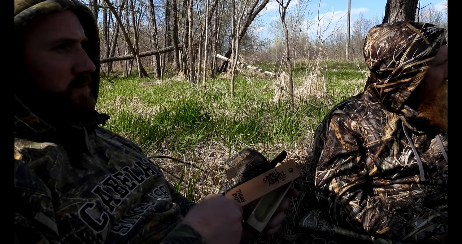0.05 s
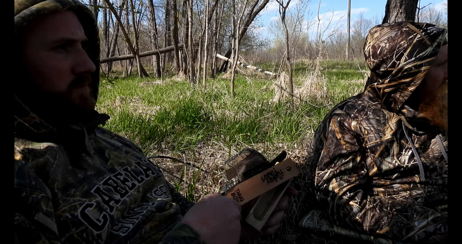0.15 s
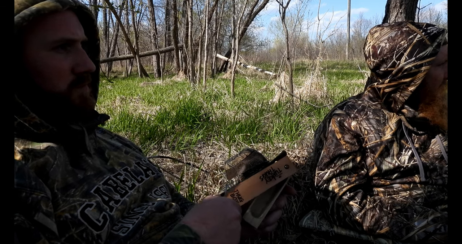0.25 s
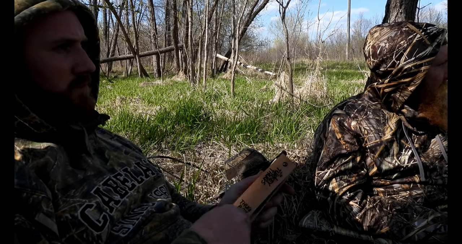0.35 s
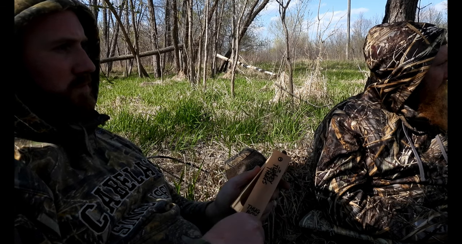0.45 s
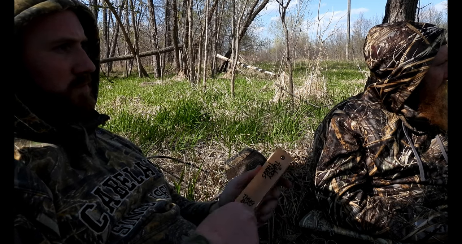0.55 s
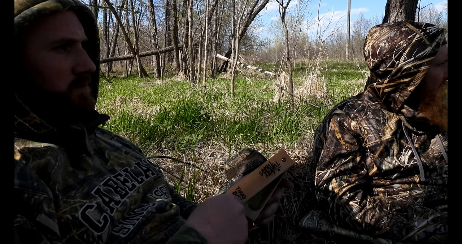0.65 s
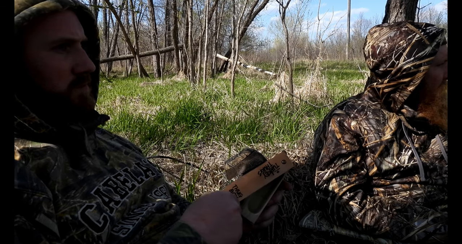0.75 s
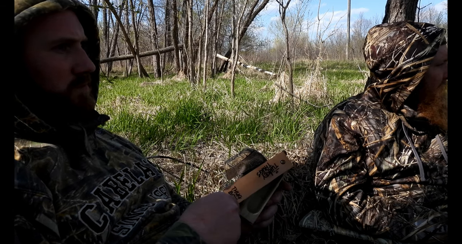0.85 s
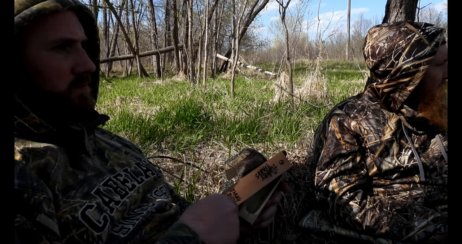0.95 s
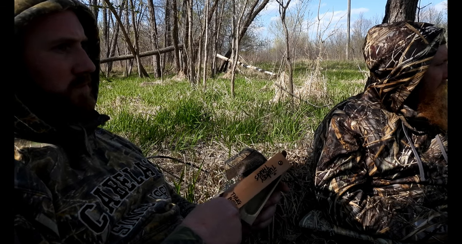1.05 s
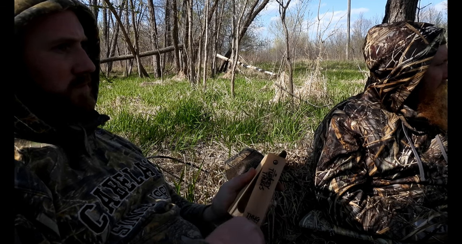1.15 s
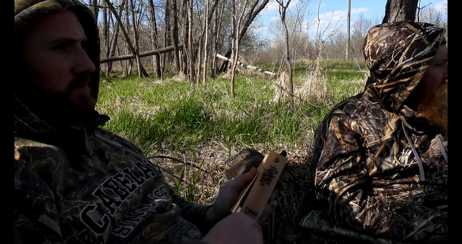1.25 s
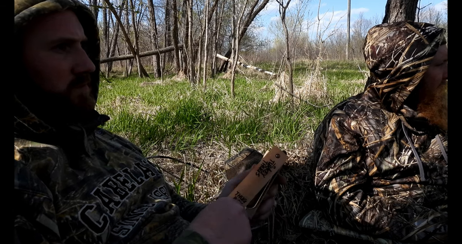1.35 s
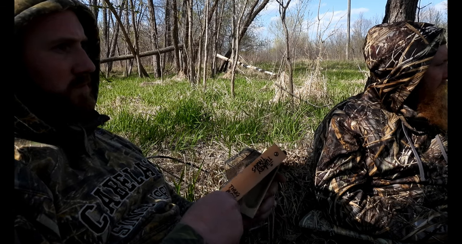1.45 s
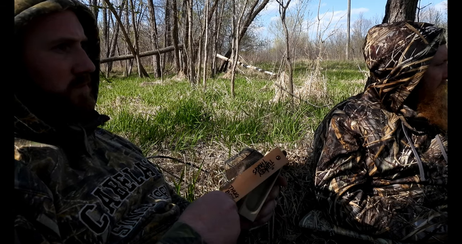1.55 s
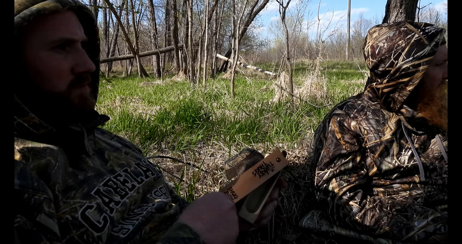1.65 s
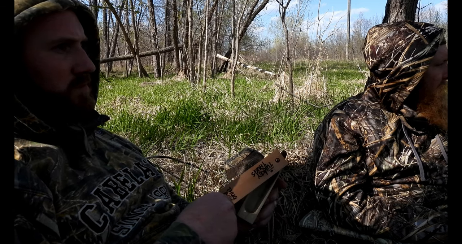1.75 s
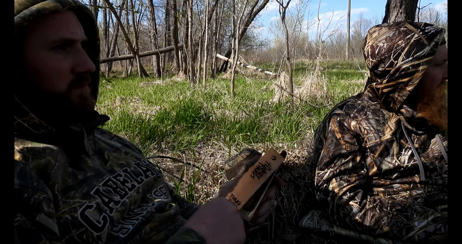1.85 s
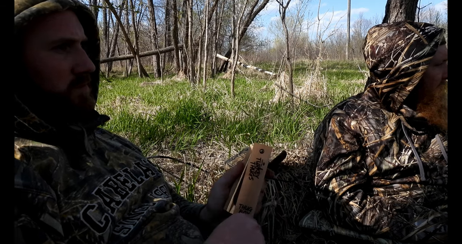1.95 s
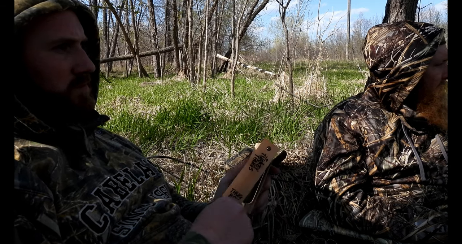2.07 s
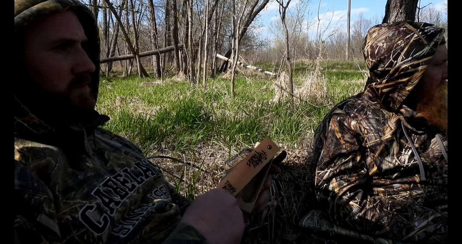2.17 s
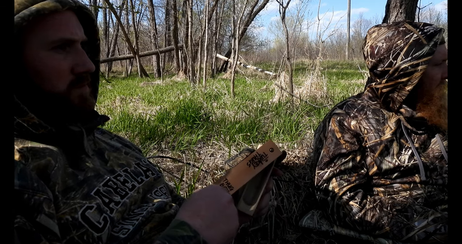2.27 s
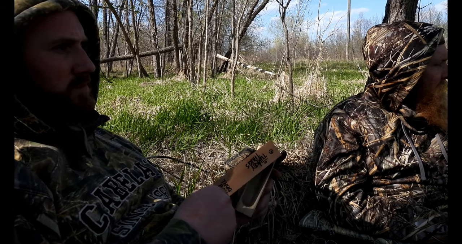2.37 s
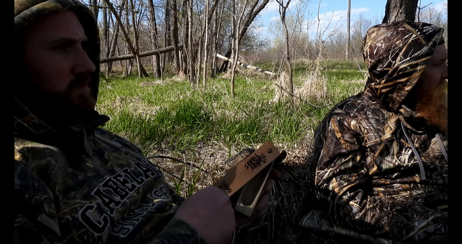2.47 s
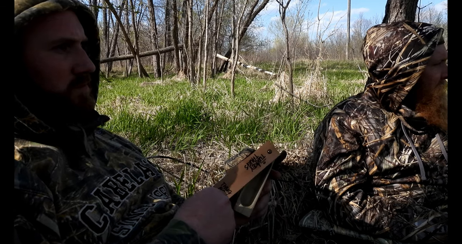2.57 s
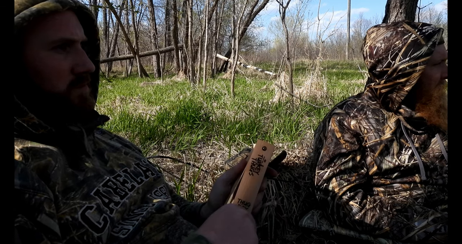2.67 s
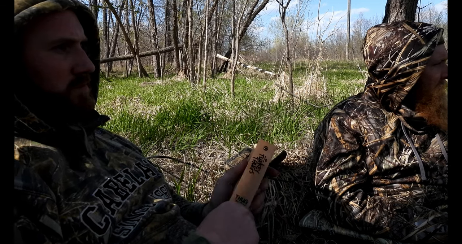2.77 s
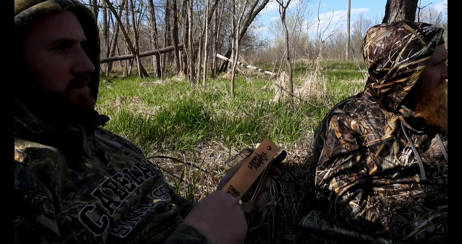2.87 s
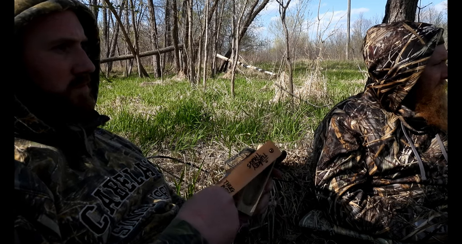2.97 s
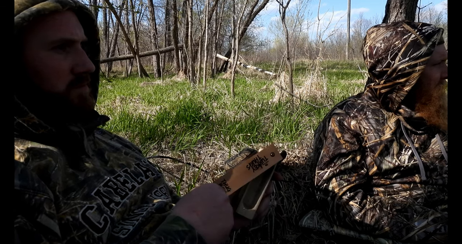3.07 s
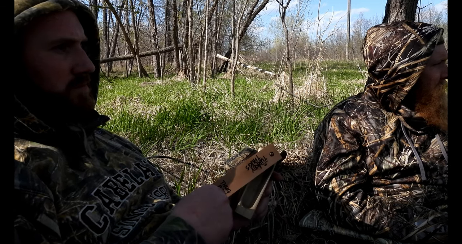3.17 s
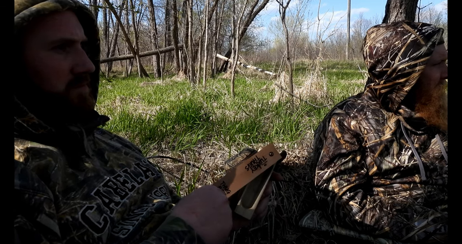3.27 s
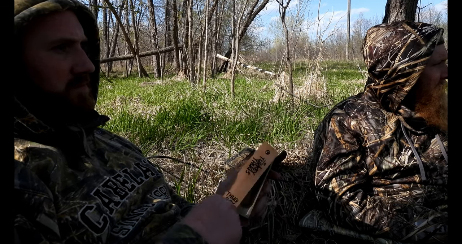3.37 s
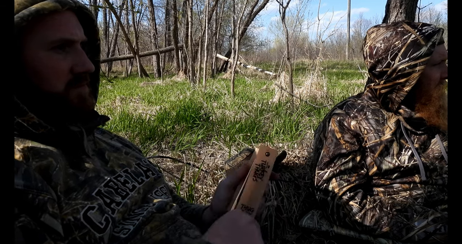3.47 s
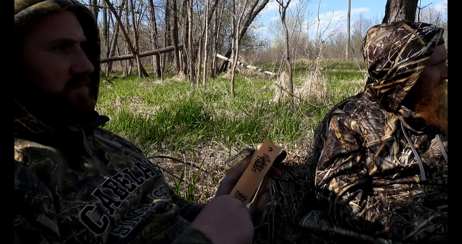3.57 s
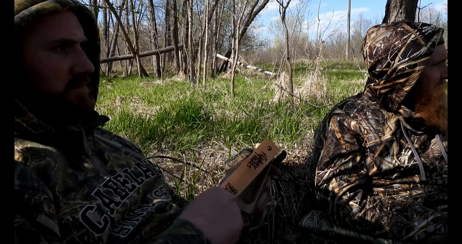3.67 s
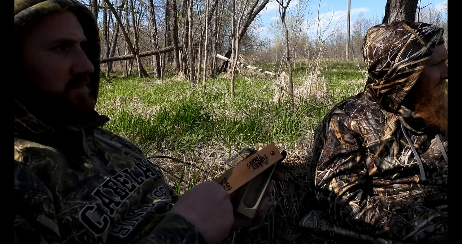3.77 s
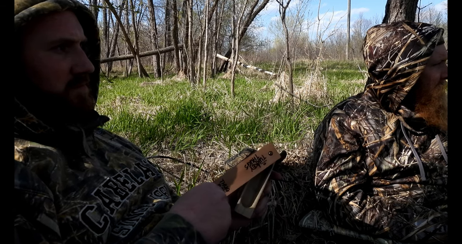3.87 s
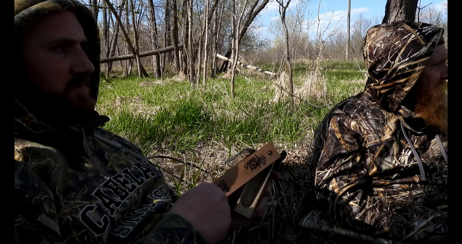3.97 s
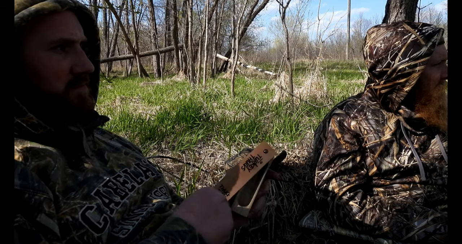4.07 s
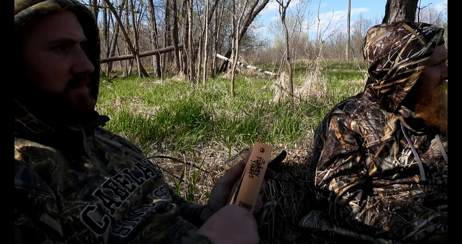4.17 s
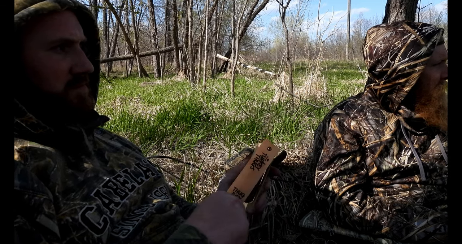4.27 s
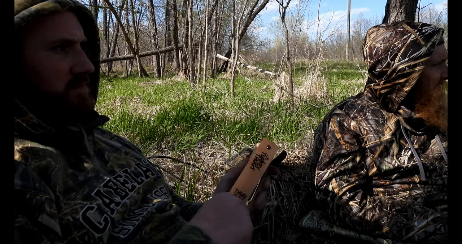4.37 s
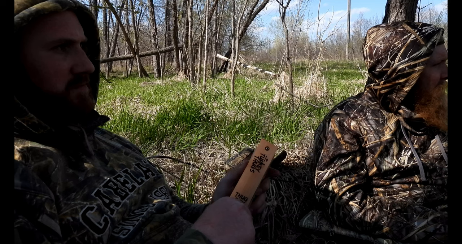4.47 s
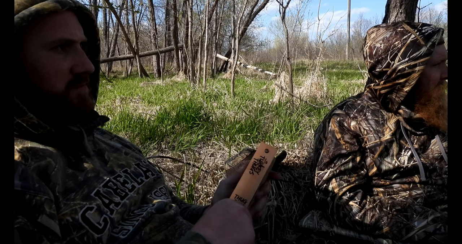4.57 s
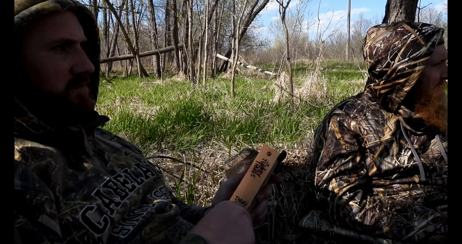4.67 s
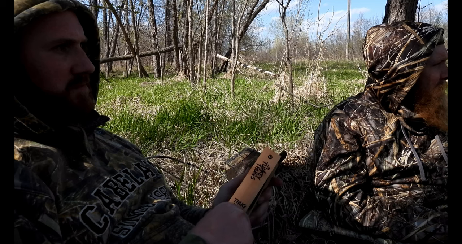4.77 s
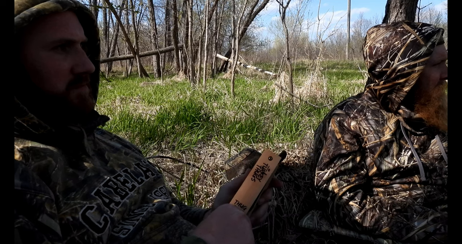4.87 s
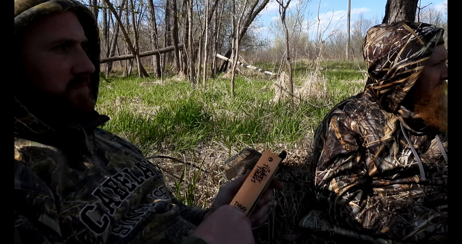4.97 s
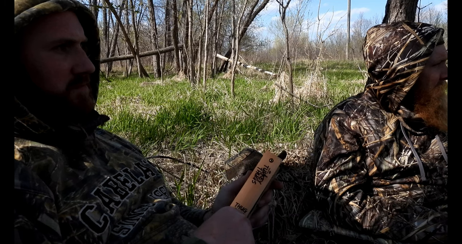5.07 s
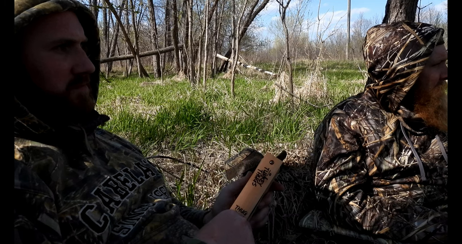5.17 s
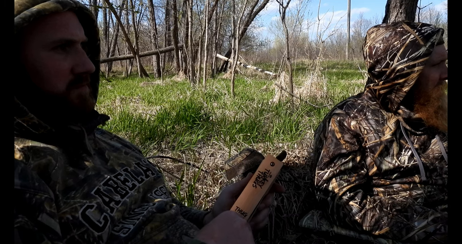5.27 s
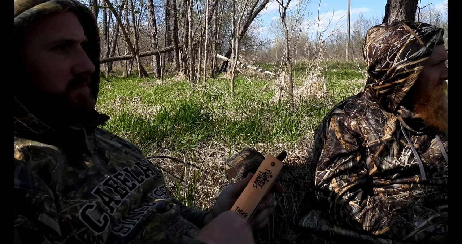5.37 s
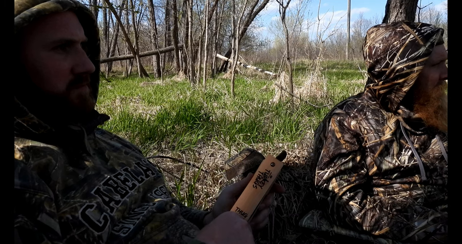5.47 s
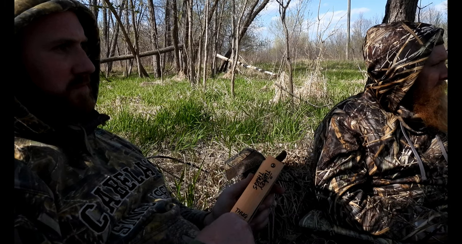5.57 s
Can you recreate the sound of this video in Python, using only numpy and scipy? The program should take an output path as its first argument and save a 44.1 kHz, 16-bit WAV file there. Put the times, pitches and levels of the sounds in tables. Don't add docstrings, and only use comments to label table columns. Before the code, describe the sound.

Quiet woods with far traffic hum and soft air hiss. A wooden box call yelps six times at a steady pace, the first longest with a dragging scrape before it, the last two shortest. Small wooden ticks come between strokes. The sound is close, dry and slightly overloaded, with a faint tree echo, ending in a closing tick and leafy rustle.

```python
import sys
import numpy as np
from scipy import signal
from scipy.fft import rfft, irfft, next_fast_len
from scipy.io import wavfile
from scipy.ndimage import uniform_filter1d

SR = 44100
rng = np.random.default_rng(int(sys.argv[2]) if len(sys.argv) > 2 else 0)


def gain_from_db(level_db):
    decades = np.asarray(level_db, float) / 20
    return 10 ** decades


def put_to_file(sound):
    columns = np.atleast_2d(sound).T
    safe = np.clip(columns, -1, 1)
    whole_steps = np.round(safe * 32767)
    wavfile.write(sys.argv[1], SR, whole_steps.astype(np.int16))


N = 248028

# (lid touches [s], grips [s], starts its sweep [s], reaches the wide end [s], lets go [s])
STROKE_TIMES = [
    (.471, .478, .495, .533, .554),
    (1.236, 1.243, 1.252, 1.280, 1.292),
    (2.017, 2.026, 2.036, 2.060, 2.066),
    (2.766, 2.778, 2.783, 2.807, 2.816),
    (3.522, 3.529, 3.535, 3.552, 3.559),
    (4.249, 4.256, 4.260, 4.275, 4.281),
]
# (time [s], length [s], first level [dB], last level [dB])
LID_SLIDE_OFFS = [
    (.571, .034, -29, -54),
    (1.309, .018, -22, -33),
    (1.327, .042, -28, -62),
]


def unit(x):
    return x / np.sqrt(np.mean(x ** 2))


def resonance(x, hz, width_hz):
    return signal.lfilter(*signal.iirpeak(hz, hz / width_hz, fs=SR), x)


def steep_resonance(x, hz, width_hz):
    return resonance(resonance(x, hz, width_hz), hz, width_hz)


def butterworth(x, order, hz, kind):
    return signal.sosfilt(signal.butter(order, hz, kind, fs=SR, output="sos"), x)


def curve(rows, column, outside):
    rows = np.array(rows)
    return np.interp(np.arange(N) / SR, rows[:, 0], rows[:, column], outside, outside)


def clicks(times_s, sizes):
    out = np.zeros(N)
    at = np.asarray(times_s)[:, None] * SR
    taps = np.floor(at).astype(int) + np.arange(-7, 9)
    window = np.cos(np.pi * (taps - at) / 16) ** 2
    np.add.at(out, taps, np.asarray(sizes)[:, None] * np.sinc(taps - at) * window)
    return out


def box(x):
    # (frequency [Hz], width [Hz], level [dB])
    modes = [(1060, 290, -1.5), (1225, 90, 4.5), (1315, 170, 5), (1600, 300, 3), (1785, 110, 1),
             (2010, 380, 1), (2330, 110, 2), (2487, 170, 0), (2956, 210, -9.5), (3136, 560, -19),
             (4100, 170, -17.5), (4730, 300, -22.5), (4900, 470, -12.5), (5313, 170, -10), (5900, 220, -13),
             (6490, 210, -24.5), (7970, 240, -28)]
    # (frequency [Hz], width [Hz], share cancelled [0-1])
    hollows = [(900, 110, .7), (2400, 200, 0.5), (3640, 570, 0.8), (4355, 350, .9), (4820, 270, 0.6)]
    rings = np.zeros(len(x))
    for k, (hz, width_hz, db) in enumerate(modes):
        rings += (-1) ** k * gain_from_db(db) * resonance(x, hz, width_hz)
    for hz, width_hz, share in hollows:
        rings = rings - share * resonance(rings, hz, width_hz)
    return butterworth(rings, 4, 880, "high")


def duck():
    drop_db, recover_db_per_s = -18, 8
    t, db = np.arange(N) / SR, np.zeros(N)
    for _, grip, *_ in STROKE_TIMES:
        since = t - grip
        db = np.where(since > 0, np.minimum(drop_db + recover_db_per_s * since, 0), db)
    return gain_from_db(uniform_filter1d(db, size=800))


def woods(gain):
    # (frequency [Hz], level per Hz [dB])
    spectrum = [(15, -43.5), (25, -12.5), (70, -5.5), (96, -3), (113, -5.5), (179, -18.5), (333, -12),
                (402, -10.5), (541, -8), (953, 1), (1510, -7.5), (2730, -27.5), (3670, -29), (6130, -31.5),
                (15800, -40)]
    level_db, flicker_db = -47.5, 0.4
    hum_hz, hum_width_hz, hum_db = 97, 9.8, -16.5
    treble_hz, treble_duck, bass_hz, bass_duck = 2940, 3.6, 60, 0.65
    spectrum_hz, spectrum_db = np.transpose(spectrum)
    size = next_fast_len(N, real=True)
    f = np.fft.rfftfreq(size, 1 / SR) + 1
    noise = rfft(rng.standard_normal(size)) * gain_from_db(np.interp(np.log(f), np.log(spectrum_hz), spectrum_db))
    noise = noise / np.sqrt(np.mean(irfft(noise, size) ** 2))
    out = gain * gain_from_db(hum_db) * unit(resonance(rng.standard_normal(N), hum_hz, hum_width_hz))
    half_octave = np.round(2 * np.log2(f))
    coarse = np.arange(0, N, 200)
    for band in range(8, 29):
        walk = np.repeat(rng.standard_normal(len(coarse) // 20 + 1), 20)[:len(coarse)]
        walk = unit(uniform_filter1d(walk, size=20))
        hz = 2 ** (band / 2)
        sink = 1 + (treble_duck - 1) / (1 + (treble_hz / hz) ** 6) + bass_duck / (1 + (hz / bass_hz) ** 4)
        band_gain = np.repeat(gain[coarse] ** sink * gain_from_db(flicker_db * walk), repeats=200)[:N]
        out = out + band_gain * irfft(noise * (half_octave == band), size)[:N]
    return out * gain_from_db(level_db)


def slides():
    # (lead [s], first level [dB], level before the bite [dB], at the bite [dB])
    approaches = [
        (.17, -58, -33, -17),
        (.046, -64, -40, -29),
        (.05, -66, -30, -22),
        (.05, -62, -33, -28),
        (.06, -64, -29, -22.5),
        (.055, -72, -23, -24),
    ]
    bite_s = .005
    ramps = []
    for (touch, *_), (lead, first_db, near_db, bite_db) in zip(STROKE_TIMES, approaches):
        ramps.append([(touch - lead, first_db), (touch - bite_s, near_db), (touch, bite_db)])
    for s, length, first_db, last_db in LID_SLIDE_OFFS:
        ramps.append([(s, first_db), (s + length, last_db)])
    return ramps


def scrapes():
    grains_per_s, hiss_db, slide_off_hiss_db = 2500, -31, 3.5
    hiss_sink = .33
    grains = (rng.random(N) < grains_per_s / SR) * rng.standard_normal(N)
    grains = grains * gain_from_db(2.5 * rng.exponential(size=N))
    body = unit(resonance(box(grains), 1650, 800))
    hiss = unit(resonance(rng.standard_normal(N) + .5 * unit(grains), 3500, 6000))
    body_gain = sum(gain_from_db(curve(rows, 1, -200)) for rows in slides())
    hiss_gain = gain_from_db(hiss_db) * body_gain ** (1 - hiss_sink) * (body_gain > 1e-6)
    for s, length, *_ in LID_SLIDE_OFFS:
        hiss_gain *= gain_from_db(curve([(s, slide_off_hiss_db), (s + length, slide_off_hiss_db)], 1, 0))
    return uniform_filter1d(body_gain, size=130) * body + uniform_filter1d(hiss_gain, size=130) * hiss


def blows():
    # (time [s], peak [dB], low ring [Hz], high ring [Hz], t60 [s])
    ticks = [
        (0.572, -24, 1171, 1609, .018),
        (1.104, -50, 893, 1600, .017),
        (1.3095, -6, 1220, 1577, .019),
        (2.613, -39, 1123, 2112, .018),
        (2.695, -30.5, 1345, 1687, .018),
        (3.353, -44.5, 957, 1536, .022),
        (4.045, -37.5, 1264, 2095, .018),
        (4.125, -36, 1320, 1610, .027),
        (5.34, -28, 1060, 1850, .035),
    ]
    # (time [s], peak [dB], high ring [Hz], t60 [s])
    catches = [
        (.458, -22, 1850, .03),
        (.4665, -19, 2200, .015),
        (3.514, -14.5, 2300, .015),
        (3.519, -21, 2000, .015),
        (4.2435, -10.5, 2400, .029),
    ]
    rows = [(s, db, low_hz, high_hz, -1.5, t60) for s, db, low_hz, high_hz, t60 in ticks]
    rows += [(s, db, 1290, high_hz, 3, t60) for s, db, high_hz, t60 in catches]
    rows += [(let_go - .0005, -8, 1200, 2610, -13, .04) for *_, let_go in STROKE_TIMES]
    return rows


def knocks():
    ring_rise_s, rattle_decay_s = 0.00053, 0.00067
    snap_db, snap_hz, rattle_db = -27, 4500, 11.5
    out, rattle, t = np.zeros(N), np.zeros(N), np.arange(SR // 8) / SR
    for s, db, low_hz, high_hz, high_db, t60 in blows():
        ring = np.sin(2 * np.pi * low_hz * t) + gain_from_db(high_db) * np.sin(2 * np.pi * high_hz * t)
        envelope = 1000. ** (-t / t60) * (1 - np.exp(-t / ring_rise_s)) ** 2
        grit = rng.standard_normal(len(t)) * np.exp(-t / rattle_decay_s)
        out[int(s * SR):][:len(t)] += gain_from_db(db - 2) * ring * envelope
        rattle[int(s * SR):][:len(t)] += gain_from_db(db) * grit
    rings = butterworth(out, 2, 700, "high")
    snap = gain_from_db(snap_db) * steep_resonance(rattle, snap_hz, 5000)
    return rings + snap + gain_from_db(rattle_db) * steep_resonance(box(rattle), 1400, 1300)


def slip_rate(touch, grip, top, wide, end):
    touch_hz, grip_hz, top_hz, wide_hz = 1270, 1330, 1362, 975
    sweep_bend, rise_hz_per_s = 1.5, 12000
    share = np.linspace(0, 1, num=10)
    fall_hz = top_hz - (top_hz - wide_hz) * share ** sweep_bend
    return [(touch, touch_hz), (grip, grip_hz), *zip(top + share * (wide - top), fall_hz),
            (end, wide_hz + rise_hz_per_s * (end - wide))]


def stroke(times, hand):
    touch, grip, top, wide, end = times
    touch_db, grip_db, wide_db, end_db, shake = hand
    shake_holds, shake_ends, ease_share = .17, .36, .7
    ease_db = -2.5
    slide_s = .006
    sweep = wide - top
    s = np.array([touch, grip, top + shake_holds * sweep, top + shake_ends * sweep,
                  top + ease_share * sweep, wide, min(wide + slide_s, end), end])
    db = np.interp(s, [touch, grip, wide, end], [touch_db, grip_db, wide_db, end_db])
    db[4] += ease_db
    rough = [.5, .17, .11, .11, .03, .07, .36, .36]
    return np.transpose([s, db, rough, shake * np.array([.4, 1, 1, 0, 0, 0, 0, 0])])


def yelps():
    # (pressure at the touch [dB], at the grip [dB], at the wide end [dB],
    # at the let-go [dB], lid shake [0-1])
    hands = [
        (-22, -12.5, -5.5, -13, .75),
        (-28, -13, -4.5, -9, .8),
        (-23, -11, -5.5, -8, .9),
        (-30, -11, -3.5, -10, .03),
        (-24, -10, -4.5, -8, .4),
        (-27, -10.5, -6, -8, 1),
    ]
    lid_turns = 5 / 3
    lid_ring_db, tone_db, scatter_db = -5, 28, 9
    rasp_db, rasp_hz, thump_db, thump_hz = -34, 8500, -43, 260
    times, sizes, pressure, ring = [], [], np.zeros(N), np.zeros(N)
    for moments, hand in zip(STROKE_TIMES, hands):
        rate_s, rate_hz = np.transpose(slip_rate(*moments))
        rows = stroke(moments, hand)
        s, db, rough, shake = np.transpose(rows)
        t = s[0]
        for stretch, scatter in rng.standard_normal((200, 2)):
            if t > s[-1]:
                break
            loose = np.interp(t, s, rough)
            lid = np.interp(t, s, shake) * np.sin(2 * np.pi * lid_turns * len(times))
            times.append(t)
            sizes.append(gain_from_db(np.interp(t, s, db) + scatter_db * loose * scatter) * (1 + 1.7 * lid))
            t += np.exp(.9 * loose ** 2 * stretch) / np.interp(t, rate_s, rate_hz)
        press = curve(rows, 1, -200)
        pressure += gain_from_db(press)
        ring += gain_from_db(press + lid_ring_db) * curve(rows, 3, 0)
    slip = clicks(times, sizes)
    tone = butterworth(box(slip), 4, 7500, "low")
    puffs = uniform_filter1d(np.abs(slip), size=24) * 30
    rasp = gain_from_db(rasp_db) * puffs * unit(resonance(rng.standard_normal(N), rasp_hz, 6700))
    low = unit(steep_resonance(rng.standard_normal(N), thump_hz, 500))
    thump = gain_from_db(thump_db) * uniform_filter1d(pressure, size=200) * low
    slip_count = np.interp(np.arange(N) / SR, times, np.arange(len(times)))
    lid_ring = uniform_filter1d(ring, size=60) * np.cos(2 * np.pi * lid_turns * slip_count)
    return gain_from_db(tone_db) * tone + lid_ring + rasp + thump


def treble_smear(near):
    level_db, t60_s = -41, .09
    t = np.arange(SR // 8) / SR
    tail = gain_from_db(level_db) * 1000. ** (-t / t60_s) * rng.standard_normal(len(t))
    return signal.fftconvolve(resonance(near, 9000, 8000), tail)[:N]


def trees(near):
    # (delay [s], level [dB])
    tree_lines = [
        (0.103, -48.5),
        (.19, -62),
    ]
    wash_db, t60_s, wash_hz, smear_s = -39.5, 0.65, 2200, 0.015
    t = np.arange(SR) / SR
    shape = gain_from_db(wash_db) * 1000. ** (-t / t60_s) * (1 - np.exp(-t / 0.015))
    for s, db in tree_lines:
        shape = shape + gain_from_db(db - 2.5) * np.exp(-.5 * ((t - s) / smear_s) ** 2)
    tail = shape * unit(resonance(rng.standard_normal(SR), wash_hz, 3000)) * gain_from_db(-42)
    return signal.fftconvolve(near, tail)[:N]


def faint_treble():
    # (time [s], length [s], level [dB])
    treble_swells = [
        (2.44, .1, -86),
        (5.09, .08, -85),
        (5.2, .8, -80),
    ]
    t = np.arange(N) / SR
    swell = sum(gain_from_db(db) * np.sin(np.pi * np.clip((t - s) / length, 0, 1)) for s, length, db in treble_swells)
    grit = rng.standard_normal(N) * gain_from_db(2.0 * rng.exponential(size=N))
    return swell * unit(resonance(resonance(grit, 5000, 6000), 6000, 9000))


def scene():
    call = scrapes() + knocks() + yelps()
    return (woods(duck()) + call + treble_smear(call) + trees(call) + faint_treble())[None]


def top_cut(x):
    return signal.sosfilt(signal.butter(12, 15900, fs=SR, output="sos"), x)


def record(dry):
    clipped = np.clip(np.tanh(0.52 * dry) / 0.59 + 0.0021 * dry ** 2, -1, 1)
    mix = dry + butterworth(clipped - dry, 2, 120, "high")
    mix = signal.sosfilt(signal.ellip(8, .2, 50, 15800, fs=SR, output="sos"), mix)
    return top_cut(mix)


dry = scene()
out = record(dry)
put_to_file(out)
```